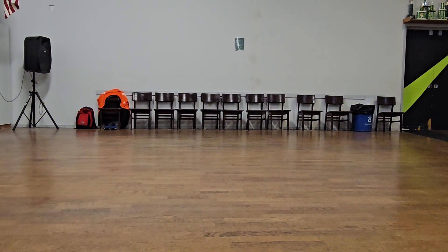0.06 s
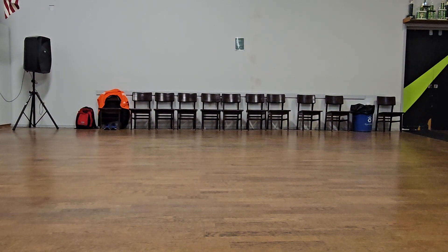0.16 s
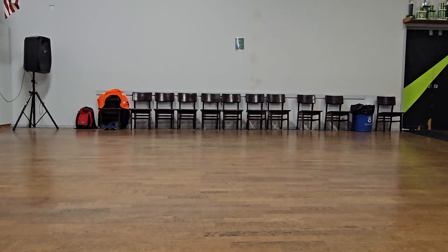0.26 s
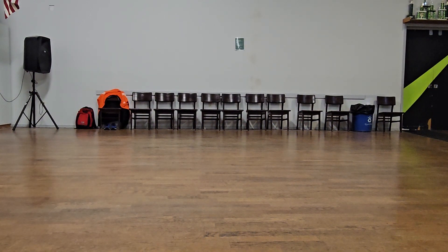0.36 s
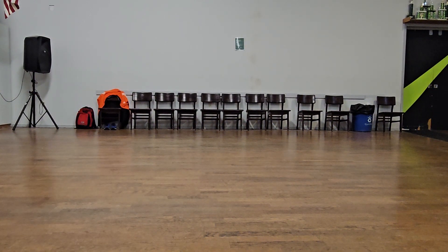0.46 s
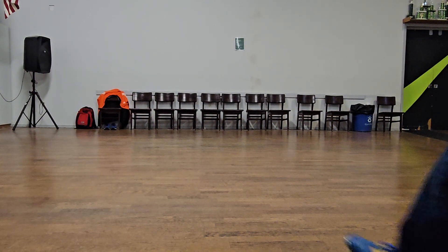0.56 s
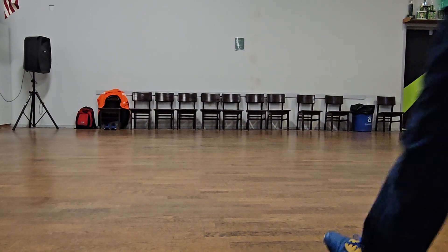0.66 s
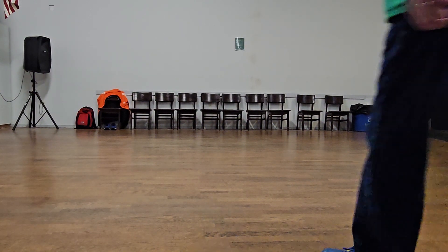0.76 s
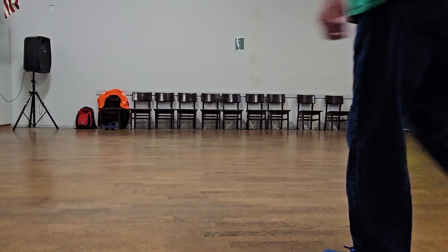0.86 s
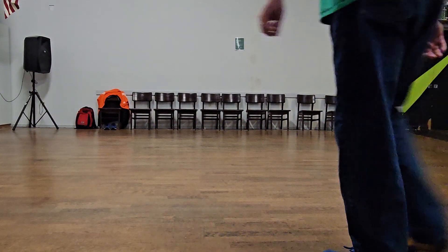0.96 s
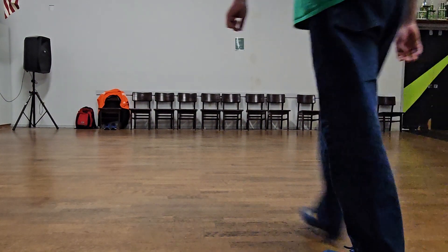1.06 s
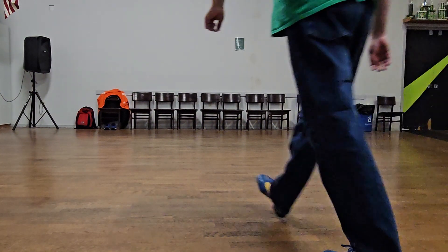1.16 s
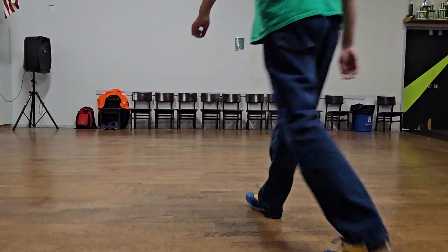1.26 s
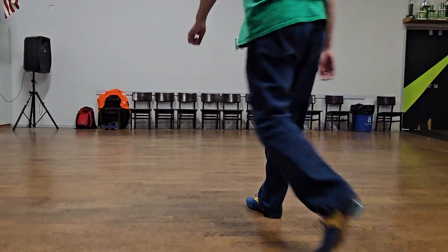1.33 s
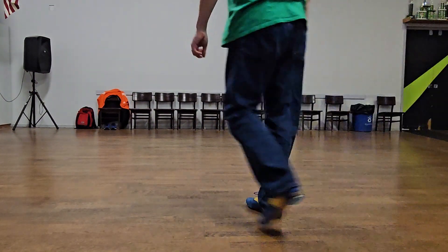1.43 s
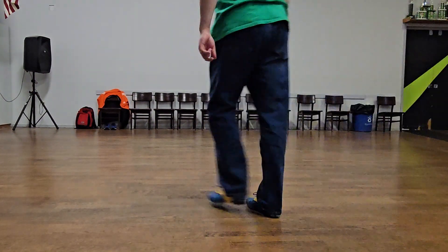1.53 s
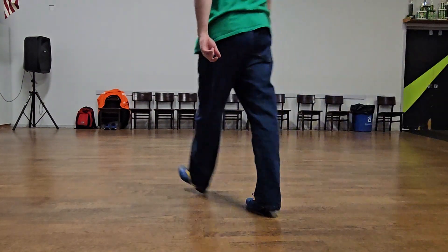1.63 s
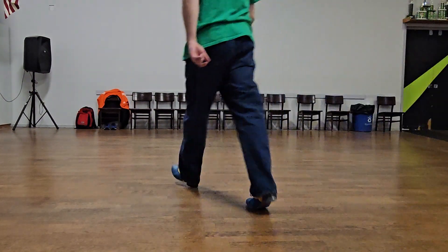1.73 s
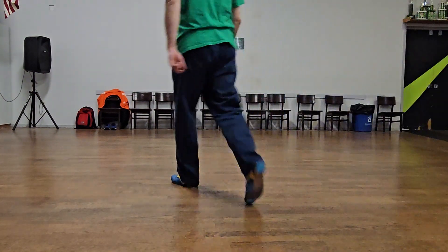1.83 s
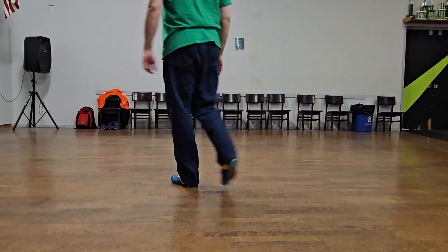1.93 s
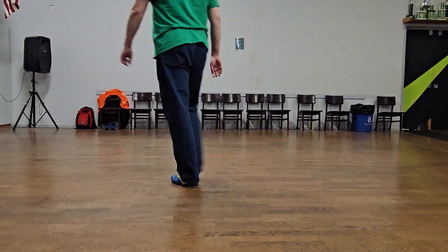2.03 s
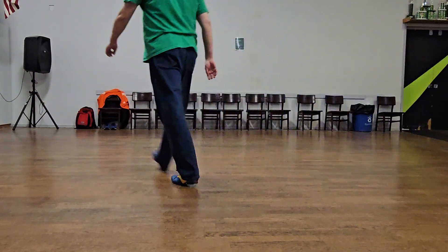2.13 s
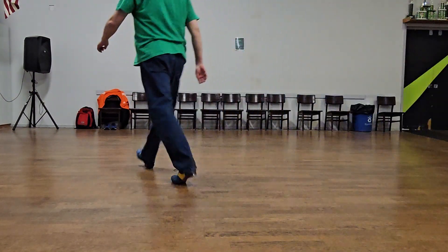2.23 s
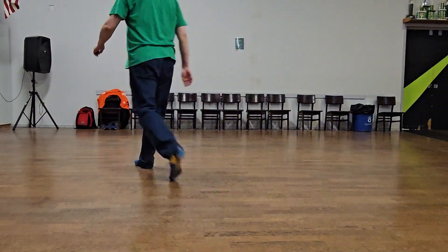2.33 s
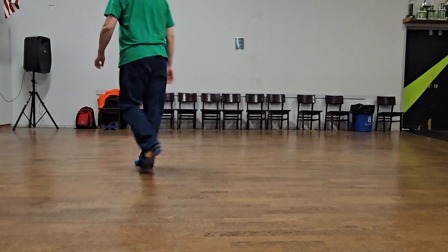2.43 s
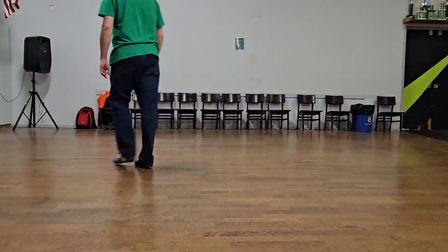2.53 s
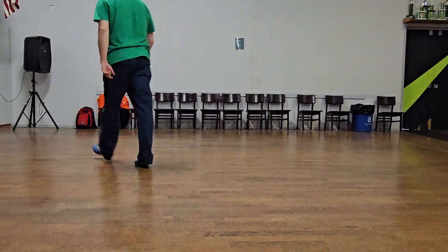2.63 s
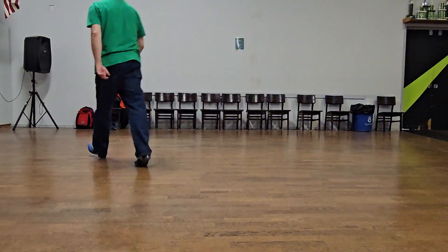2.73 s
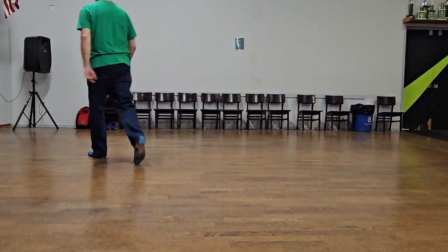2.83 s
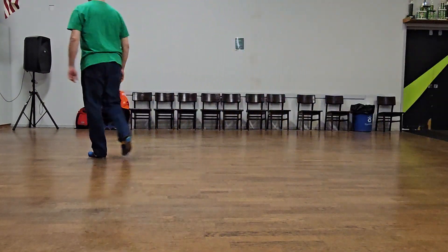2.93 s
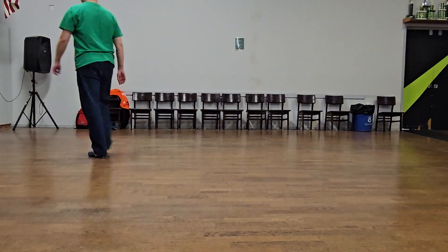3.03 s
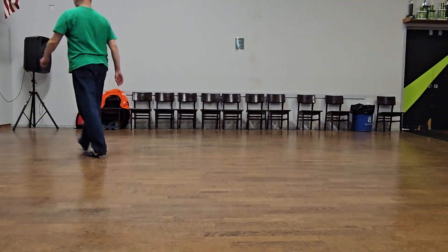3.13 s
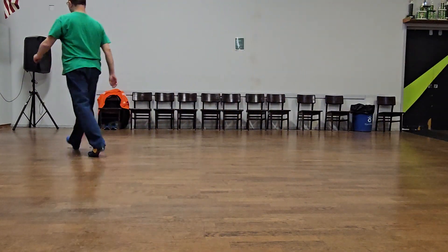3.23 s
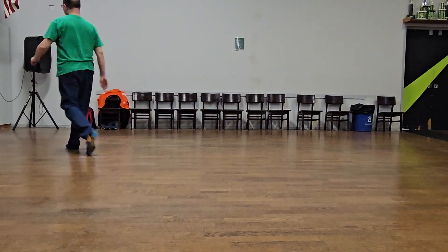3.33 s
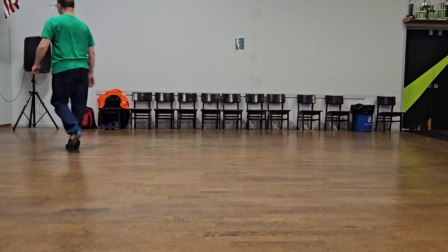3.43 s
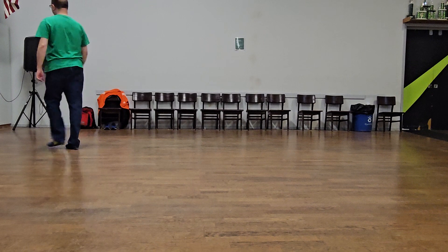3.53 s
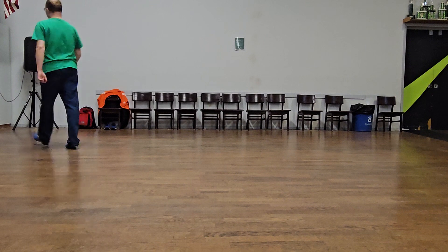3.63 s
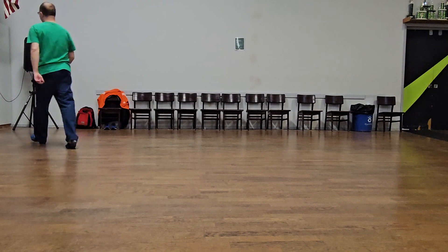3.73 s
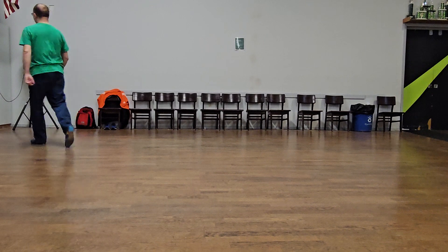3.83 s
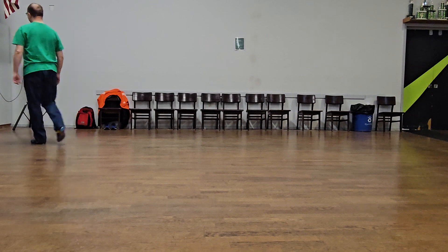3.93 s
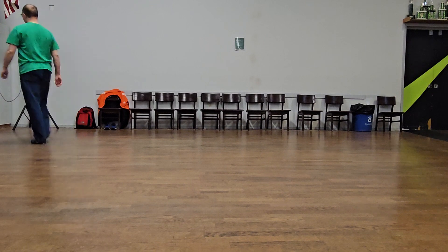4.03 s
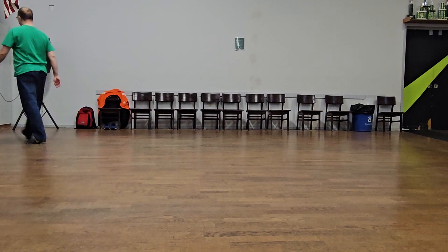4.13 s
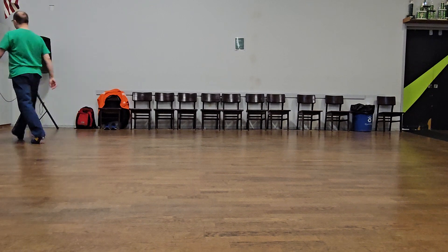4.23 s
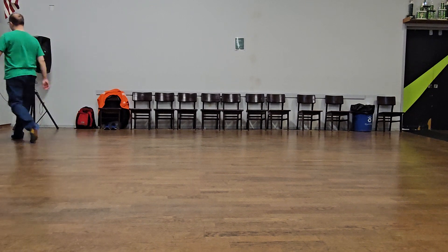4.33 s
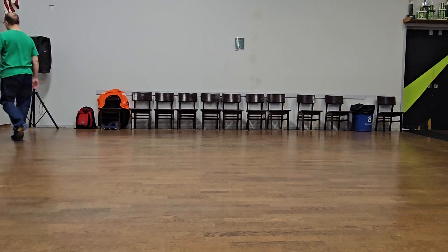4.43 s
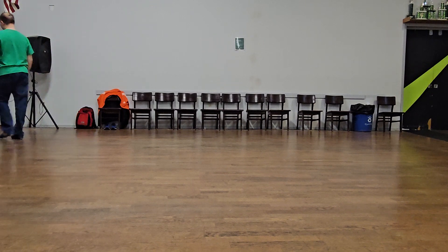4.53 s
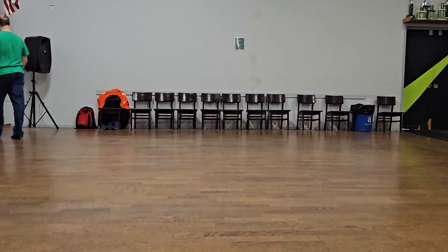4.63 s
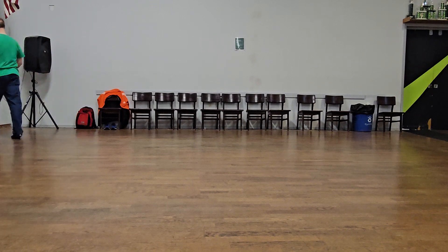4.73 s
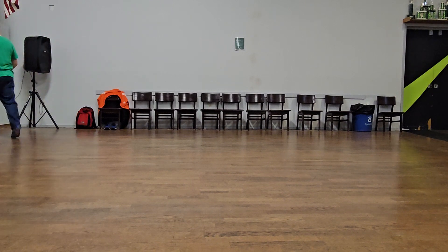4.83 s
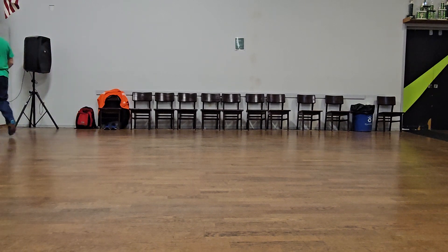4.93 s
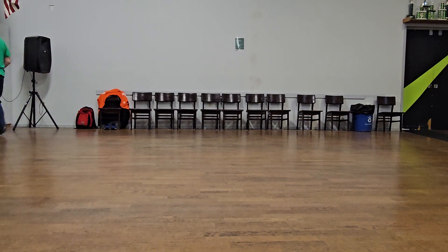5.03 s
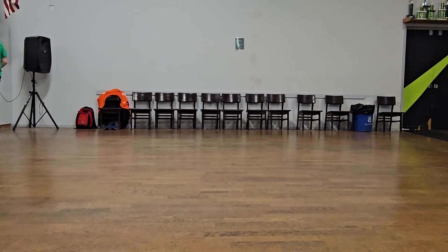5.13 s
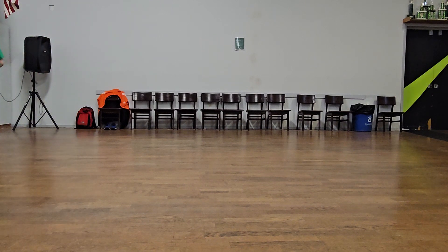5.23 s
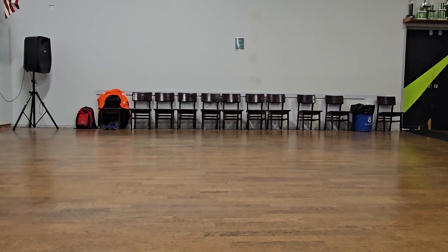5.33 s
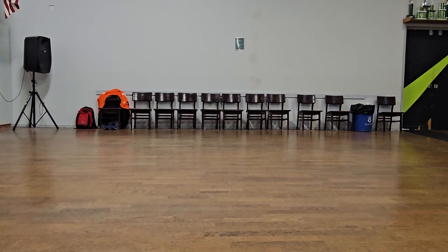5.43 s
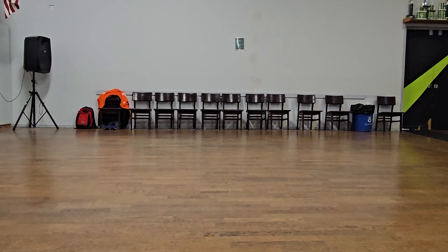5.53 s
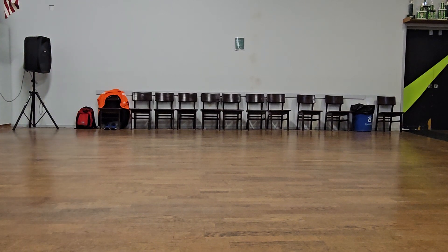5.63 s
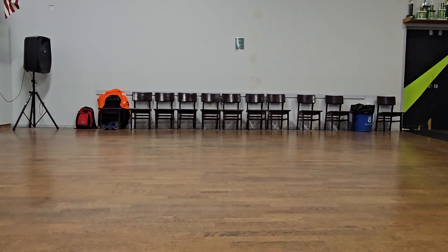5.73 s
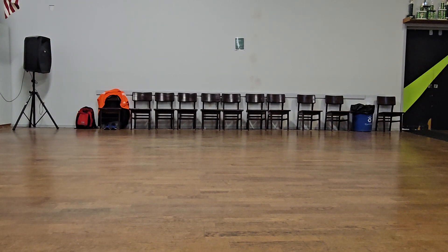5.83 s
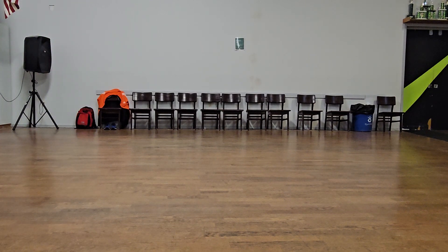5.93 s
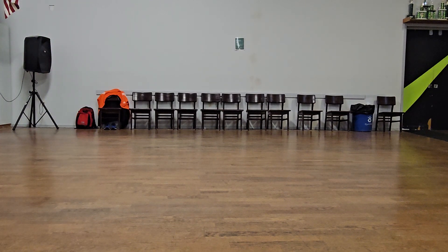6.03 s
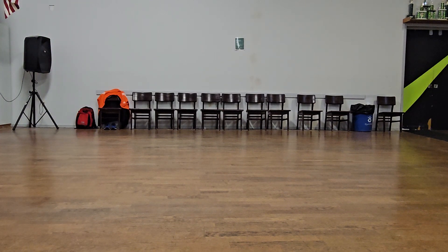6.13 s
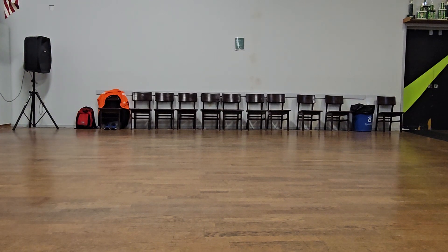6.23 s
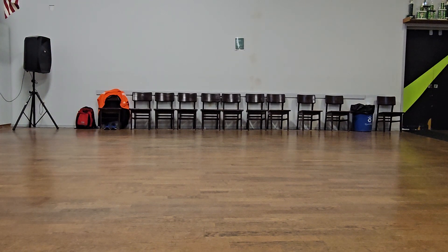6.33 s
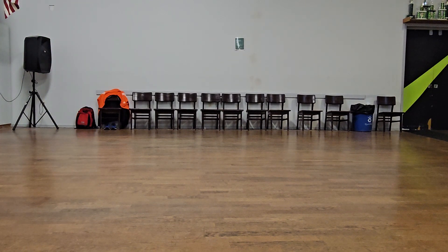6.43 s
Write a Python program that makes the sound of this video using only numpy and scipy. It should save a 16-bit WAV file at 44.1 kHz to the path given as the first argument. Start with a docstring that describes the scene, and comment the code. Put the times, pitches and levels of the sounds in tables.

```python
"""Someone walks away from the microphone across the wooden floor of a large bare hall.
Each heel crunches down as grainy noise, then thumps the boards and makes one knock. The sole follows
with a scuff of noise, tiny snaps and the clink of a metal lace tip, built from fading sines.
Rubber squeaks are gliding tones. The direct sound fades with distance while the hall keeps ringing;
ventilation rumble, a low hum and a faint hiss lie behind."""
import sys
import numpy as np
from scipy import signal
from scipy.fft import rfft, irfft
from scipy.io import wavfile
from scipy.ndimage import map_coordinates

SR = 44100
rng = np.random.default_rng(int(sys.argv[2]) if len(sys.argv) > 2 else 0)


def generate_wav(signal):
    """Clip the signal to [-1, 1] and save it as 16-bit WAV at the path in sys.argv[1]."""
    frames = np.transpose(np.atleast_2d(signal))
    scaled = np.clip(frames, -1, 1) * 32767
    pcm = np.round(scaled).astype(np.int16)
    wavfile.write(sys.argv[1], SR, pcm)


N = 285158
TIME = np.arange(N) / SR
PORT_SPACING_S = 0.00058  # sound's travel time between the two microphone ports

# heel strikes, before each layer's own trim: t/s, level/dB, hardness/dB,
# knock of the board underfoot f/Hz, knock level against the heel/dB
HEEL_STRIKES = [(0.6676, -8.5, -0.5, 382, -18), (1.2153, -7.5, -2.5, 323, -5),
                (1.7334, -8, -3.5, 303.8, -9), (2.2338, -8, -2, 674, -3), (2.7385, -8, -0.5, 377, -3.5),
                (3.237, -7, -1, 630, -5.5), (3.7344, -9, -1, 410, -26), (4.2364, -8, -1.5, 558, -4),
                (4.7651, -13, -2.5, 228.2, -14), (5.278, -20, -17, 338, 4), (5.7989, -20.5, -4, 604, -4)]
# soles coming down flat, about a tenth of a second after their heels, before each layer's own trim:
# t/s, scuff level/dB, thud level/dB, slap level/dB
SOLE_LANDINGS = [(0.771, -32, -47, -43), (1.3194, -23, -27, -9), (1.8348, -28, -28.5, -8),
                 (2.332, -23.5, -25.5, -13), (2.839, -24.5, -36.5, -8.5), (3.3324, -21.5, -25, -7.5),
                 (3.84, -21.5, -27.5, -10), (4.342, -20, -26.5, -5.5), (4.869, -18, -24, -11.5),
                 (5.385, -22.5, -26.5, -12.5)]
# tone colour of rubbing shoe and floor: f/Hz, relative level/dB
SCUFF_COLOUR = [(300, -9.5), (700, -5), (1200, -2), (1700, 4.5), (2300, 1.5), (3200, 0), (4300, 1),
                (6000, -11.5), (9000, -20)]
# tone colour of the bright part of every contact: f/Hz, relative level/dB
TREBLE_COLOUR = [(2000, -24.5), (4000, -8.5), (6500, 0), (8500, -4.5), (12000, 4), (16000, -7.5)]


def from_db(db):
    """Decibels to gain."""
    return 10 ** (np.asarray(db) / 20)


def rms_one(x):
    """Scale to unit power."""
    return x / np.sqrt(np.mean(x ** 2) + 1e-20)


def at_hz(points, hz):
    """Read a table between its points, on a log-frequency axis."""
    f, value = np.transpose(points)
    return np.interp(np.log(np.maximum(hz, 1)), np.log(f), value)


def response(spectrum, size=4096):
    """Turn a spectrum into a minimum-phase filter: its energy comes as early as it can."""
    level_db = at_hz(spectrum, np.fft.rfftfreq(size, 1 / SR))
    cepstrum = irfft(np.log(from_db(level_db)))
    # folding the second half onto the first keeps the filter from sounding before the blow
    cepstrum[1:size // 2] *= 2
    cepstrum[size // 2 + 1:] = 0
    return irfft(np.exp(rfft(cepstrum)))


def colour(x, spectrum):
    """Give white noise a spectrum, keeping its power."""
    h = response(spectrum)
    return signal.fftconvolve(x, h / np.linalg.norm(h))[:N]


def add(out, s, sound):
    """Mix a short sound in at time s."""
    i = int(np.clip(round(s * SR), 0, N - 1))
    out[..., i:i + sound.shape[-1]] += sound[..., :N - i]


def grains(spread_db, size=16384):
    """Tiny contacts of very uneven strength."""
    strength = np.minimum(rng.exponential(1, size), 4)
    return rms_one(rng.standard_normal(size) * from_db(spread_db * strength))


def burst(rise_s, decay_s, spread_db, rounds=3):
    """Grains that swell quickly and die away, with their energy spread evenly over frequency."""
    g = grains(spread_db)
    t = TIME[:len(g)]
    envelope = (1 - np.exp(-t / rise_s)) ** 2 * np.exp(-t / decay_s)
    envelope /= envelope.max()
    g = g * envelope
    # flatten the spectrum, then gently restore the shape in time; repeat
    for _ in range(rounds):
        spectrum = rfft(g)
        flat = irfft(spectrum / (np.abs(spectrum) + 1e-12))
        g = flat * envelope ** (1 / 4)
    return g * np.linalg.norm(envelope) / np.linalg.norm(g)


def ring(hz, t60_s):
    """A struck mode: a sine that dies away, by 60 dB in t60_s."""
    t = TIME[:SR // 10]
    return np.sin(2 * np.pi * hz * t) * np.exp(-np.log(1000) * t / t60_s)


def hiss():
    """Thin, even noise, different at each port, that fades and swells slowly."""
    # the hiss over time: t/s, level/dB
    hiss_course = [(0, -54), (1.7, -69), (5.2, -62.5), (6.4, -87)]
    gain = from_db(np.interp(TIME, *np.transpose(hiss_course)))
    return gain * rng.standard_normal((2, N))


def hum(hz=110.3, level_db=-51, hold_s=.5, fade_db_per_s=11.5):
    """A low, pure tone that holds, then dies away."""
    fade_db = fade_db_per_s * np.maximum(TIME - hold_s, 0)
    return from_db(level_db - fade_db) * np.sin(2 * np.pi * hz * TIME)


def ventilation(level_db=-56, side_db=-17.5):
    """A quiet rumble of coloured noise, nearly alike at both ports."""
    # tone colour of the ventilation: f/Hz, relative level/dB
    rumble_colour = [(20, -13), (32, -10), (45, -2), (75, -0.5), (120, -15), (200, -7.5), (350, -24.5),
                     (1000, -27.5), (4000, -46.5), (15000, -62.5)]
    mid, side = [rms_one(colour(rng.standard_normal(N), rumble_colour)) for _ in range(2)]
    return from_db(level_db) * (mid + from_db(side_db) * side * [[1], [-1]])


def hall_response(gap_s=0.019, build_s=0.0069, scatter=0.54, echo_hz=2500, size=65536, count=10):
    """The hall from one spot: weak scatter, a few dull echoes, then a diffuse tail that dies band by band."""
    # time the hall takes to die away by 60 dB: f/Hz, time/s
    decay_times = [(120, 1.1), (350, 0.89), (1000, 1.4), (2500, 1.25), (4500, 1.05), (8000, 0.59),
                   (15000, 0.24)]
    # tone colour of the hall: f/Hz, level/dB
    hall_colour = [(80, -13), (200, -11.5), (400, -12.5), (1000, -4), (3000, -9.5), (8000, -11),
                   (15000, -14)]
    # first echoes from walls and ceiling, before they are dulled: delay t/s, level/dB
    first_echoes = [(0.0182, -18.5), (0.0227, -23), (0.034, -27), (0.046, -37)]

    hz, t = np.fft.rfftfreq(size, 1 / SR), TIME[:size]
    alike = np.sinc(2 * hz * PORT_SPACING_S)  # how alike diffuse sound is at two nearby ports
    mid, side = rfft(rng.standard_normal((2, size)))
    both_ports = np.sqrt(1 + alike) * mid + np.sqrt(1 - alike) * side * [[1], [-1]]
    field = both_ports * from_db(at_hz(hall_colour, hz)) / np.sqrt(2)

    late = np.maximum(t - gap_s, 0)
    swell = 1 - (1 - scatter) * np.exp(-late / build_s)
    centres = np.geomspace(120, 15000, count)
    tail = 0
    for centre, band in zip(centres, np.eye(count)):
        envelope = swell * np.exp(-np.log(1000) * late / at_hz(decay_times, centre))
        band_noise = irfft(field * at_hz(np.c_[centres, band], hz))
        tail = tail + band_noise * envelope / np.linalg.norm(envelope)

    echoes = np.zeros((2, size))
    for delay, db in first_echoes:
        # a small shift shared by both ports, and one for each port alone
        arrival = delay + rng.normal(0, .0006) + rng.uniform(-.0003, .0003, 2)
        echoes[[0, 1], (arrival * SR).astype(int)] += from_db(db)
    dulling = signal.butter(1, echo_hz, fs=SR, output="sos")
    return tail + signal.sosfilt(dulling, echoes)


def hall(x):
    """Every footfall rings the hall from a new spot."""
    out = np.zeros((2, N))
    # each stretch begins 50 ms before a heel
    edges = [0] + [int(row[0] * SR) - SR // 20 for row in HEEL_STRIKES] + [N]
    for start, end in zip(edges, edges[1:]):
        ringing = signal.fftconvolve(x[None, start:end], hall_response(), axes=1)
        add(out, start / SR, ringing)
    return out


def squeaks(width_hz=300):
    """Rubber sticks and slips on the varnish: a hoarse, gliding tone."""
    # rubber squeaks: t/s, length/s, first f/Hz, last f/Hz, level before the mix/dB
    squeak_list = [(1.003, 0.13, 2750, 2297, -34.5), (4.745, 0.035, 3700, 3545, -27.5),
                   (4.838, 0.056, 2200, 3016, -24), (4.866, 0.086, 3950, 4243, -23.5),
                   (4.89, 0.061, 2700, 3045, -20.5), (5.795, 0.044, 3000, 3170, -37)]
    out = np.zeros(N)
    lowpass = signal.butter(2, width_hz, fs=SR, output="sos")
    for s, length, first_hz, last_hz, db in squeak_list:
        u = np.linspace(0, 1, int(length * SR))
        # slow noise roughens the tone
        slips = signal.sosfilt(lowpass, rng.standard_normal((2, SR // 2)))
        phase = 2 * np.pi * np.cumsum(first_hz + (last_hz - first_hz) * u) / SR
        tone = rms_one(slips[0, :len(u)] * np.sin(phase) + slips[1, :len(u)] * np.cos(phase))
        add(out, s, from_db(db) * np.sin(np.pi * u) * tone)
    return out


def clinks(level_db=6.0, slap_to_lace_db=-5.0, bounce_db=-22.0, return_s=0.028, return_db=-14):
    """Each slap throws a metal lace tip against the shoe twice; every hit rings and bounces once."""
    # ringing modes of the lace tip: f/Hz, relative level/dB, time to die away by 60 dB/s
    tip_modes = [(2660, -18, 0.038), (4863, -9, 0.027), (7690, -1.5, 0.021), (8410, -6.5, 0.0061),
                 (11550, -9, 0.02), (14423, -10.5, .015)]
    # clinks as the weight shifts before the walk, before the trim: t/s, level/dB
    loose_clinks = [(0.0298, -35), (0.0977, -40)]
    hits = list(loose_clinks)
    for s, _, _, slap in SOLE_LANDINGS:
        db = slap + slap_to_lace_db
        swing_back_s = return_s * rng.uniform(.8, 1.2)
        hits += [(s, db), (s + swing_back_s, db + return_db)]
    out = np.zeros(N)
    hz, mode_db, t60_s = np.transpose(tip_modes)[:, :, None]
    for s, db in hits:
        uneven_db = rng.normal(0, 1.1, hz.shape)
        clink = np.sum(from_db(db + level_db + mode_db + uneven_db) * ring(hz, t60_s), axis=0)
        add(out, s, clink)
        add(out, s + rng.uniform(.006, 0.011), from_db(bounce_db) * clink)
    return out


def snaps(treble_db=0.0, middle_db=0.5, slap_middle_db=-7.5, length_s=.0009,
          after_s=.05, after_db=-17.5, count=3):
    """Millisecond slips of the loaded shoe and boards: single ones, one per sole slap, weaker ones after it."""
    # single loud snaps, before the trims: t/s, treble level/dB, middle level/dB
    single_snaps = [(0.1286, -26.5, -32.5), (0.539, -37, -24), (0.5579, -15, -19), (0.7715, -35, -21.5),
                    (0.839, -22.5, -27), (1.0153, -28, -18.5), (1.3335, -16.5, -25), (1.8715, -14, -14),
                    (2.3416, -10, -10), (2.875, -8, -18.5)]
    slips = list(single_snaps)
    for s, _, _, slap in SOLE_LANDINGS:
        slips.append((s, slap, slap + slap_middle_db))
        for when, size in rng.random((count, 2)):
            db = slap + after_db + 6 * (size - .5)
            slips.append((s + after_s * when, db, db + slap_middle_db))
    top, middle = np.zeros((2, N))
    for s, treble, mid in slips:
        add(top, s, from_db(treble + treble_db) * burst(.0001, length_s, 3.5))
        add(middle, s, from_db(mid + middle_db) * burst(0.00022, 1.38 * length_s, 3.5))
    return colour(top, TREBLE_COLOUR) + colour(middle, SCUFF_COLOUR)


def soles(scuff_db=3.0, thud_db=4.0, grit_db=-1.5, brush_thud_db=-1.0,
          lead_s=.012, brush_lead_s=.008, length_s=0.031):
    """The forefoot rolls down or brushes the floor: a soft thud under a gritty scuff."""
    # a sole brushing the floor between footfalls, before the trims: t/s, level/dB
    brushes = [(0.153, -44.5), (0.55, -36.5), (2.3723, -29.5), (4.7484, -35), (4.9143, -39), (5.2344, -29),
               (5.3242, -32)]
    # tone colour of the soft thud: f/Hz, relative level/dB
    thud_colour = [(80, -29.5), (160, -13.5), (240, -5), (360, -6.5), (600, -1.5), (1000, -8.5),
                   (2500, -37)]
    middle, low, top = np.zeros((3, N))
    # each rub begins a little ahead of its listed time
    rubs = [(s - lead_s, scuff, thud) for s, scuff, thud, _ in SOLE_LANDINGS]
    rubs += [(s - brush_lead_s, db, db + brush_thud_db) for s, db in brushes]
    for s, scuff, thud in rubs:
        add(middle, s, from_db(scuff + scuff_db) * burst(0.0074, length_s, 8.0))
        add(top, s, from_db(scuff + grit_db) * burst(0.005, length_s, 11.0))
        add(low, s, from_db(thud + thud_db) * burst(0.0069, 0.36 * length_s, 0.87))
    return colour(middle, SCUFF_COLOUR) + colour(top, TREBLE_COLOUR) + colour(low, thud_colour)


def boards(force, delay_hz=420):
    """The floor thumps under a blow; its bending waves deliver the lows a little late."""
    # tone colour of the floor's thump: f/Hz, relative level/dB
    thump_colour = [(50, -24), (110, -15), (160, -13), (220, 0), (340, 5), (450, 3), (620, -5.5),
                    (900, -14.5), (1600, -27), (4000, -63)]
    # an all-pass filter: it delays the lows but leaves the loudness of every pitch alone
    r = np.exp(-2 * np.pi * delay_hz / SR)
    thump = signal.lfilter([-r, 1], [1, -r], response(thump_colour))
    return signal.fftconvolve(force, thump / np.abs(thump).max())[:N]


def forefoot_taps(tap_db=18.0, lead_s=0.00415):
    """The ball of the foot knocks lightly on the boards."""
    # light taps of the feet before the walk begins: t/s, level/dB
    shuffles = [(0.08, -24.5), (0.16, -25.5), (0.559, -23)]
    sole_taps = [(s - lead_s, thud + tap_db) for s, _, thud, _ in SOLE_LANDINGS]
    force = np.zeros(N)
    for s, db in shuffles + sole_taps:
        add(force, s, from_db([db]))
    return boards(force)


def heels(crunch_db=-2.0, treble_db=0.0, thump_db=6.0, touch_s=0.0033, settle_s=0.00077, rise_s=0.00065,
          softening=.6, land_s=.0052, land_share=1.35, board_t60_s=0.077):
    """The heel's edge crunches, slower when softer; the weight lands with a sharper crunch, thump and knock."""
    # tone colour of the crunch: f/Hz, relative level/dB
    crunch_colour = [(150, -17), (500, 6.5), (800, -2.5), (1200, -3), (1700, 0), (2400, 0), (3400, 3.5),
                     (5000, -13.5), (8000, -18.5)]
    middle, top, force, knocks = np.zeros((4, N))
    for s, db, hardness, knock_hz, knock in HEEL_STRIKES:
        slow = from_db(-softening * hardness)
        # first the edge touches, then the weight lands: delay, strength, decay
        contacts = [(0, 1, touch_s), (.85 * land_s, land_share, settle_s)]
        for delay, share, decay in contacts:
            middle_gain = share * from_db(db + crunch_db)
            top_gain = share * from_db(db + hardness + treble_db)
            add(middle, s + delay, middle_gain * burst(slow * rise_s, decay, 2.1))
            add(top, s + delay, top_gain * burst(slow * rise_s, decay, 4.9))
        add(force, s + land_s, from_db([db + thump_db]))
        add(knocks, s + land_s, from_db(db + knock) * ring(knock_hz, board_t60_s))
    return colour(middle, crunch_colour) + colour(top, TREBLE_COLOUR) + boards(force) + knocks


def scene(sole_direct_db=2.0, snap_direct_db=4.0):
    """Direct sound falls with distance and moves to the left; the hall's share does not fall with distance."""
    # the walker: t/s, distance/m, lag of the left ear/ms
    walk = [(0, 2.6, 0.38), (.67, 2.78, .18), (1.22, 3.07, 0.036), (1.74, 3.26, -0.053),
            (2.74, 5.7, -0.1695), (4.24, 6.6, -.26), (5.8, 8.8, -0.3)]
    s, metres, lag_ms = np.transpose(walk)
    distance = np.interp(TIME, s, metres)
    lag = np.interp(TIME, s, lag_ms) * SR / 1000  # in samples
    blows = heels() + forefoot_taps()
    clicks = snaps() + clinks()
    rubbed = soles() + squeaks()
    at_one_metre = blows + from_db(snap_direct_db) * clicks + from_db(sole_direct_db) * rubbed
    direct = at_one_metre / distance
    # half the lag delays one ear, the other half advances the other
    ears = np.array([map_coordinates(direct, [np.arange(N) - way * lag / 2], order=3) for way in (1, -1)])
    return ears + hall(blows + clicks + rubbed) + ventilation() + hum() + hiss()


def record(dry, cutoff_hz=16450):
    """The microphone ports colour the treble, and the top is cut."""
    # tone colour of the ports: f/Hz, level/dB
    port_colour = [(100, -2.5), (7000, -3), (8900, 2), (9700, -12.5), (11200, -12.5), (12700, -7),
                   (14000, -4.5), (16000, -17)]
    coloured = signal.fftconvolve(dry, response(port_colour)[None], axes=1)[:, :N]
    top_cut = signal.ellip(10, .3, 70, cutoff_hz, fs=SR, output="sos")
    return signal.sosfilt(top_cut, coloured)


dry = scene()
out = record(dry)
generate_wav(out)
```